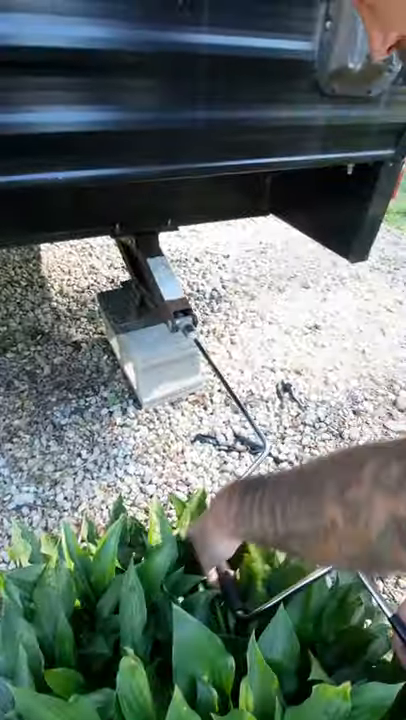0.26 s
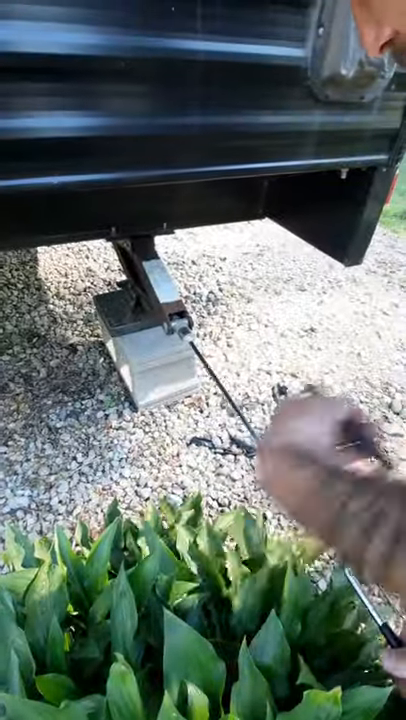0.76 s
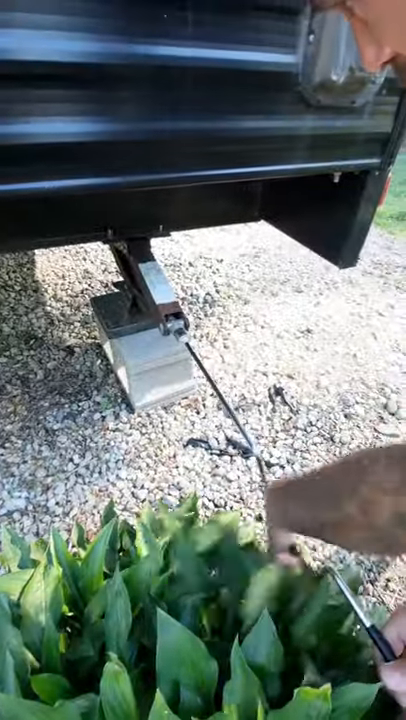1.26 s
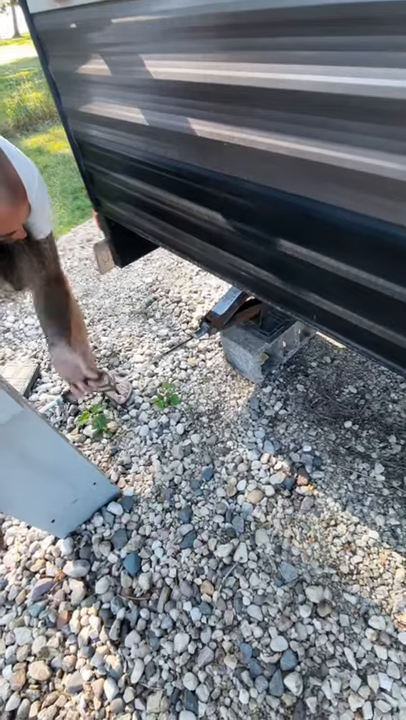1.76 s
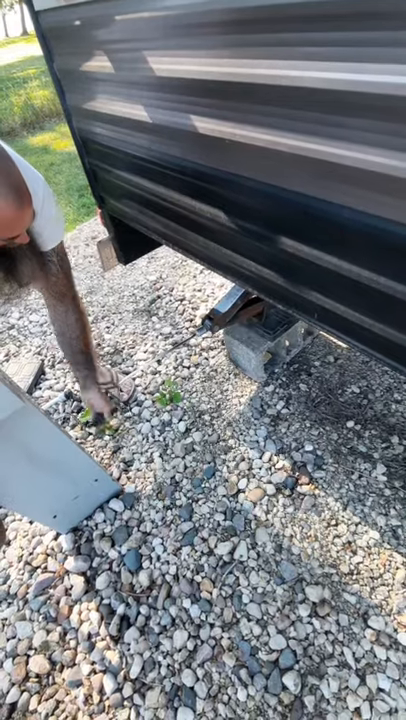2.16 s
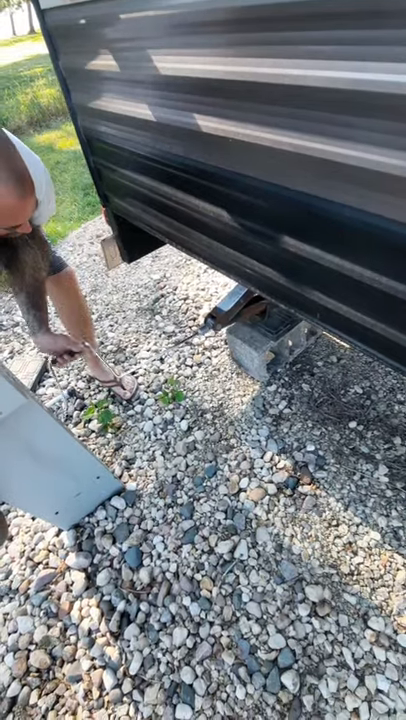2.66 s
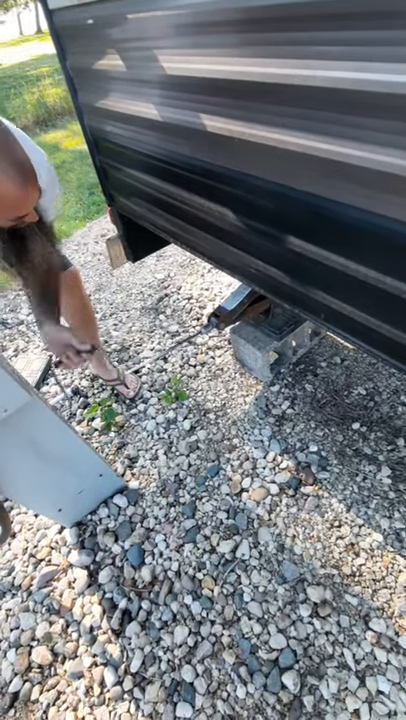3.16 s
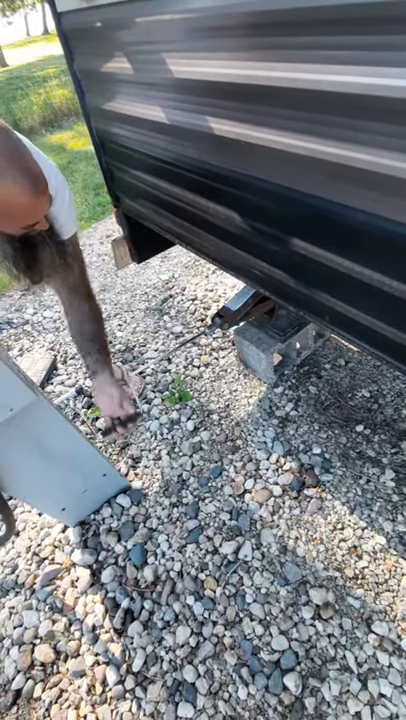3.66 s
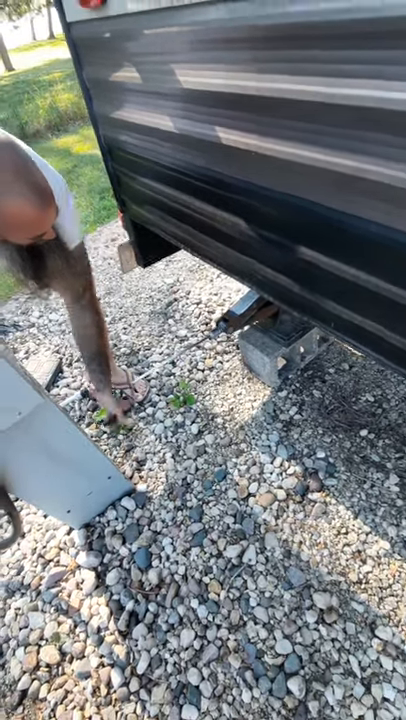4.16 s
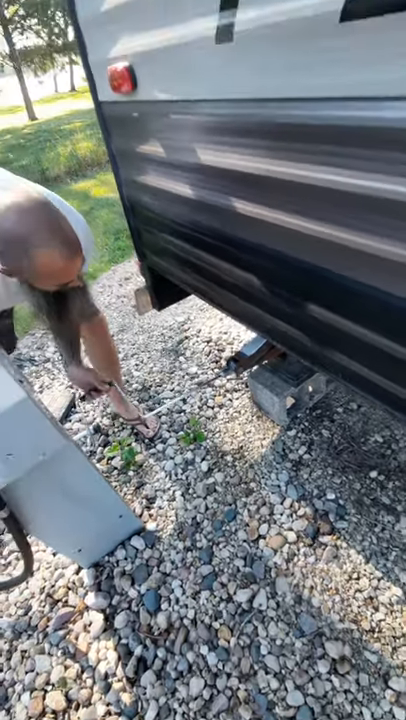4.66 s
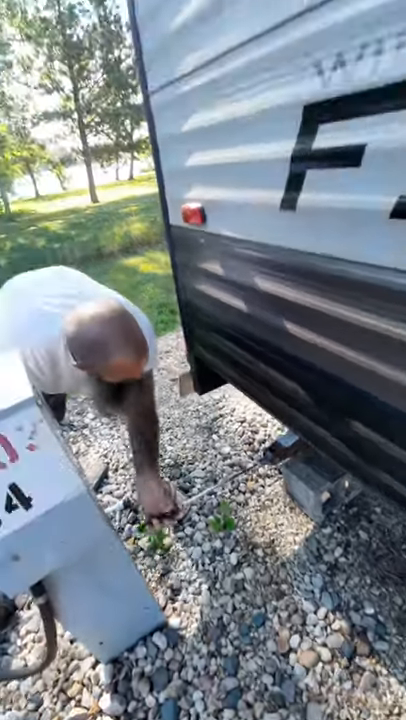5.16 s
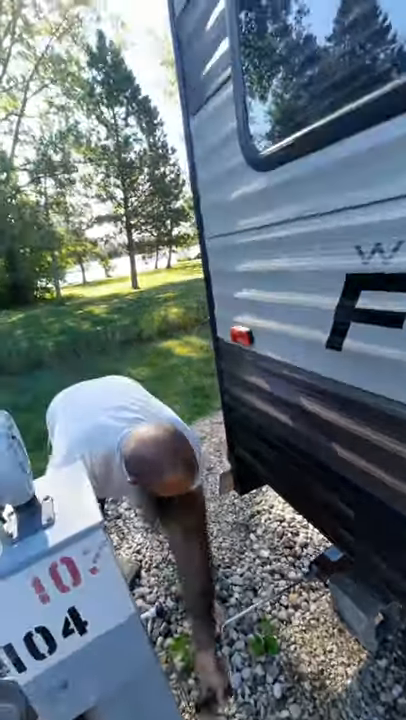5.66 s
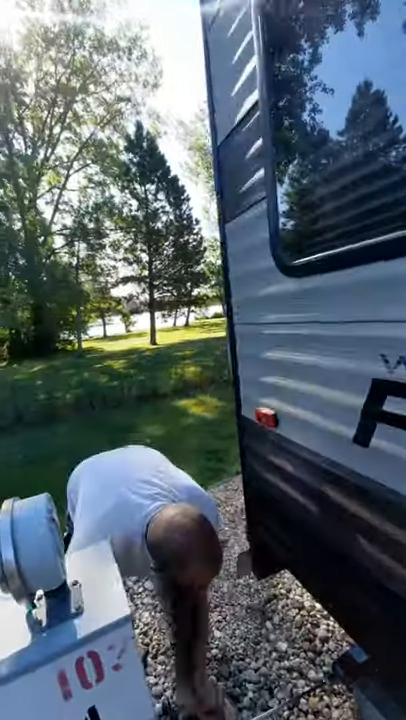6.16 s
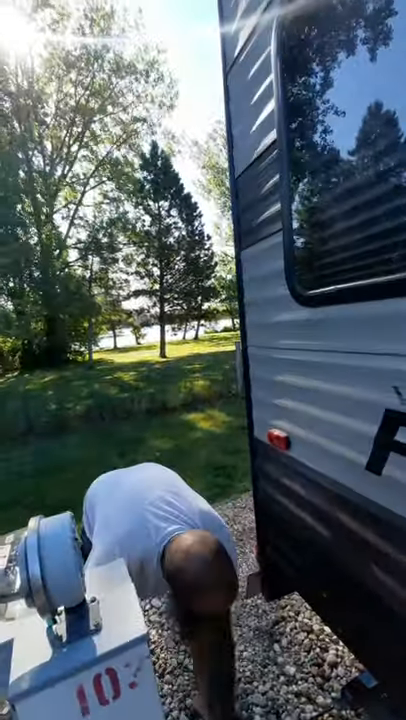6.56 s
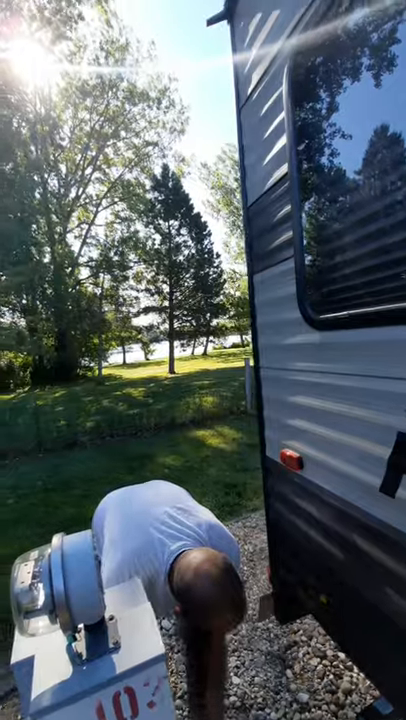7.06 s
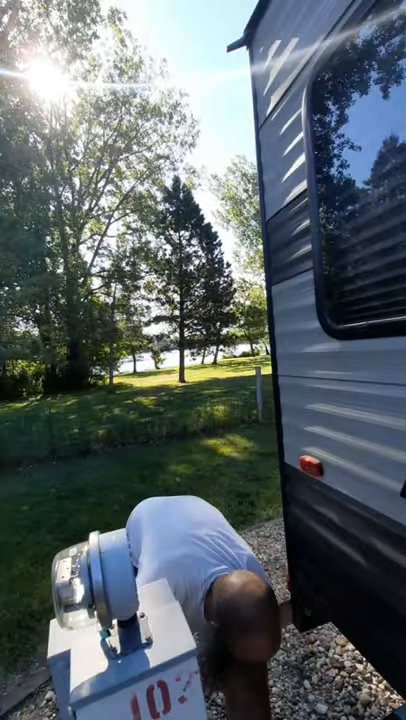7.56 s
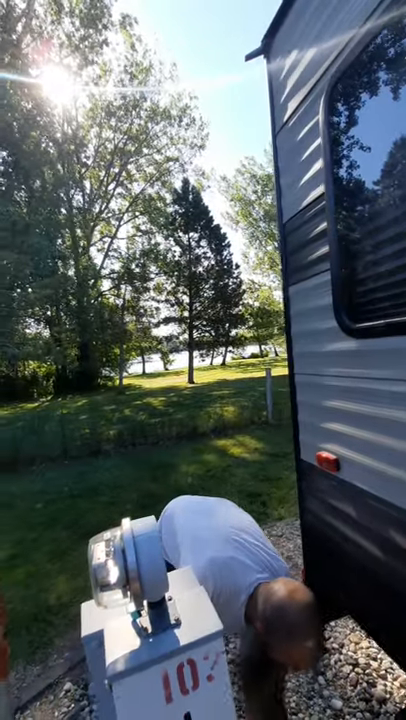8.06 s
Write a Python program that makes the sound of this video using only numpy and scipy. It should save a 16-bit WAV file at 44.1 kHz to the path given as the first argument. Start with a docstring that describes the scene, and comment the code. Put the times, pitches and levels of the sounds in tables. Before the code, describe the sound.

A loose crank knocks and rattles in its socket beneath a parked trailer, with quiet open air behind. After faint foliage brushes, the screw grinds and gives bright, very brief chirping squeaks, densest in the middle. Later it scrapes and groans under load, the frame booms low, and the clatter thins out. The sound is dry and near, with slight scatter off gravel and two momentary gaps.

```python
"""Stick-slip and impact in a hand-cranked trailer jack

Outdoors, a steel stabilizer jack under a trailer is wound up by hand. The loose crank knocks, exciting the
damped modes of jack and frame; the dry screw grinds as broadband friction that follows the crank effort,
squeaks as kHz stick-slip, scrapes as dense tiny chirps and groans as slow judder. Air, a far hum and early
leaf brushing lie behind. Two brief silences interrupt the sound."""
import sys
import numpy as np
from scipy import signal
from scipy.fft import rfft, irfft, next_fast_len
from scipy.io import wavfile
from scipy.ndimage import uniform_filter1d, map_coordinates

SR = 44100
rng = np.random.default_rng(int(sys.argv[2]) if len(sys.argv) > 2 else 0)


def file_out(sig):
    """Save sig as 16-bit WAV at sys.argv[1]."""
    # one column per channel
    cols = np.atleast_2d(sig).T
    # limit, then scale
    lim = np.clip(cols, -1, 1)
    pcm = np.round(lim * 32767).astype(np.int16)
    wavfile.write(sys.argv[1], SR, pcm)


N = 365985
TIME = np.arange(N) / SR

# Levels in the tables are relative: the functions add their own trims.
# Far hum. Each row: frequency in Hz, mean level in dB.
FAR_HUM = [(75, -62.5), (143, -65)]
# Spectrum of the open air. Each row: frequency in Hz, density in dB.
AIR_SPECTRUM = [(20, -13.5), (35, -3.5), (70, 1), (140, -4), (215, -8.5), (350, 6.5), (1000, -11.5),
                (2500, -4.5), (4500, -0.5), (8000, -14), (15000, -13.5)]
# Soft brushing, as of an arm against leaves. Each row: peak time in seconds, half-length in seconds, level in dB.
BRUSH_STROKES = [(0.503, 0.11, -44.5), (1.071, 0.071, -44.5), (1.234, 0.075, -43)]
# Spectrum of the brushing. Each row: frequency in Hz, density in dB.
BRUSH_SPECTRUM = [(300, -1.5), (1500, -7), (4000, -1), (8000, -7), (13000, -8), (16000, -9)]
# The trailer shifts on the jack. The one row: start in seconds, level in dB.
TRAILER_SHIFT = (7.205, -18)
# Drive of the grinding. Each row: time in seconds, crank effort as frame hum in dB, low rumble in dB.
CRANK_EFFORT = [(0.0, -50, -45), (0.08, -63.5, -69), (0.68, -43, -65), (0.88, -58.5, -64),
                (1.6, -43, -49.5), (1.88, -50.5, -46), (2.16, -38.5, -41.5), (3.32, -52, -53.5),
                (3.52, -50, -48), (3.88, -53.5, -72), (3.96, -45.5, -68), (4.88, -52.5, -52),
                (4.96, -52.5, -39), (5.52, -52, -51.5), (6.84, -41.5, -61.5), (7.08, -57.5, -54),
                (7.32, -36.5, -45), (7.64, -64.5, -55), (7.88, -45, -58), (8.28, -56.5, -49)]
# Spectrum of the trailer body's rumble. Each row: frequency in Hz, density in dB.
RUMBLE_SPECTRUM = [(20, -42.5), (45, 6), (72, 0), (115, 5), (165, -16), (220, -17), (500, -46.5)]
# Modes of the trailer frame, before the rise under load. Each row: frequency in Hz, level in dB, t60 in seconds.
FRAME_MODES = [(99, -11.5, 0.44), (153.8, -8.5, 0.38), (290.3, -4, 0.42), (294, -4, 0.34), (311.4, 2, 0.22),
               (326.8, 1, 0.4), (349.5, 3, 0.16), (385, -8, 0.1), (479, -21.5, 0.43)]
# Modes of jack and crank, before detuning. Each row: frequency in Hz, level in dB, t60 in seconds.
STEEL_MODES = [(517, -4.5, 0.22), (638.5, 5, 0.26), (734, -6.5, 0.077), (923, -1.5, 0.16), (991, 2.5, 0.21),
               (1238, 7, 0.075), (1663, 0.5, 0.18), (1759, 8, 0.075), (2070, -11.5, 0.034),
               (2245, 7, 0.086), (2360, 2, 0.058), (2786, -1, 0.1), (3670, 2.5, 0.036)]
# High modes of the screw rod, before detuning. Each row: frequency in Hz, level in dB, t60 in seconds.
ROD_MODES = [(3690, 1.5, 0.041), (3670, -5.5, 0.14), (3900, -5, 0.29), (4130, 21, 0.006), (4170, -3, 0.18),
             (4270, 8, 0.089), (4510, 7, 0.095), (5990, 6.5, 0.11), (7200, -6, .07), (7620, -13, 0.31),
             (8000, -3, 0.096), (11600, -6, 0.059), (11800, -8.5, 0.055)]
# The crank knocks in its socket. Each row: start in seconds, steel clank in dB, frame thud in dB.
CRANK_KNOCKS = [(0.231, -33, -33.5), (0.739, -33.5, -28.5), (1.059, -34.5, -28), (1.376, -49.5, -32.5),
                (1.512, -35, -27), (1.73, -55, -32.5), (1.896, -46, -45), (2.016, -46, -43),
                (2.052, -49, -36), (2.136, -40, -43), (2.144, -27, -48), (2.18, -32, -24),
                (2.237, -31, -33), (2.28, -45, -40), (2.373, -42, -29), (2.524, -36, -42), (2.62, -35, -25),
                (2.868, -32.5, -26), (2.949, -42, -32), (3.304, -45.5, -37), (3.389, -45.5, -38),
                (3.498, -25, -43), (3.537, -40, -28.5), (3.614, -40.5, -31), (3.925, -37.5, -38.5),
                (3.945, -38, -36.5), (3.96, -34.5, -33), (3.983, -40, -35), (4.002, -40, -46),
                (4.1, -43, -52), (4.02, -49, -54), (4.323, -37, -31), (4.435, -49, -33.5),
                (4.627, -34.5, -44), (4.656, -35.5, -42), (4.912, -33, -35.5), (5.005, -42, -33.5),
                (5.056, -43, -47), (5.108, -50.5, -32.5), (5.344, -40.5, -35), (5.678, -40, -27),
                (5.957, -44.5, -49), (6.185, -38.5, -35), (6.42, -43, -34), (6.563, -44, -42),
                (6.779, -46, -32), (6.865, -44.5, -34), (6.921, -47, -34.5), (7.234, -39.5, -27.5),
                (7.788, -41, -31.5), (7.931, -63, -30), (7.97, -50.5, -41)]
# Spectrum of the clank's crack and of the grinding. Each row: frequency in Hz, density in dB.
CLANK_SPECTRUM = [(150, -24.5), (450, 13), (1000, 5.5), (2300, 7), (3500, 3.5), (6000, -2), (12000, -15),
                  (16000, -21.5)]
# Spectrum of the jack arms' many close modes. Each row: frequency in Hz, density in dB.
ARMS_SPECTRUM = [(200, -15), (420, 5), (650, -3.5), (1300, 2.5), (2400, 1), (4000, -17.5), (12000, -34.5)]
# Groans of the loaded screw, one list each. Each row: time in seconds, slip rate in Hz, level in dB.
SCREW_GROANS = [
    [(5.98, 340.3, -41), (6.05, 341, -27), (6.11, 314.6, -29.5), (6.15, 338.8, -42.5), (6.23, 349, -23),
     (6.33, 366, -37), (6.38, 345, -52)],
    [(6.54, 449, -42), (6.58, 467, -35), (6.708, 451, -29), (6.736, 402.3, -31.5), (6.75, 351.6, -22.5),
     (6.788, 337.4, -12), (6.812, 353.5, -28.5), (6.872, 337.4, -31), (6.93, 318, -33.5), (7.01, 315, -43)],
    [(7.24, 350, -29), (7.3, 359.7, -37), (7.47, 353, -60)],
]
# Spectrum of the arms' buzz in a groan. Each row: frequency in Hz, gain in dB.
BUZZ_SPECTRUM = [(500, -2), (650, -9.5), (1100, -7.5), (4000, -2)]
# Sharp dry ticks of the socket. Each row: start in seconds, level in dB.
SOCKET_TICKS = [(1.511, -42.5), (1.866, -45), (2.237, -64), (2.618, -63), (4.913, -27.5), (6.917, -31),
                (7.962, -34)]
# Steel scraping on steel. Each row: start in seconds, rise in seconds, fall in seconds, level in dB,
# treble against the body in dB.
STEEL_SCRAPES = [(2.469, 0.0053, 0.052, -30, -6.5), (2.86, 0.013, 0.013, -24, -21),
                 (3.82, 0.012, 0.019, -34, -1), (3.93, 0.058, 0.098, -42.5, 0.5),
                 (4.179, 0.0064, 0.12, -44, -5), (5.202, 0.0065, .012, -31, -26),
                 (5.674, 0.0064, 0.065, -40.5, -10.5), (5.804, 0.01, 0.019, -47, -16),
                 (5.859, 0.016, 0.0096, -42.5, 3.5), (5.906, 0.0054, 0.011, -38, -30),
                 (5.987, 0.0088, 0.09, -36, 7), (6.144, 0.0083, 0.07, -32.5, -8),
                 (6.209, 0.0039, 0.017, -37, -3.5), (6.222, 0.03, 0.06, -27, -1),
                 (6.255, 0.048, 0.043, -27, -3), (6.554, 0.0099, 0.067, -39.5, -29.5),
                 (6.715, 0.033, 0.015, -27.5, -12), (6.742, 0.054, 0.026, -20.5, -12),
                 (6.84, 0.041, 0.027, -33, -11), (6.943, 0.014, 0.027, -38, 5),
                 (7.119, 0.02, 0.12, -36.5, 10.5), (7.2, 0.065, 0.1, -36, -13.5),
                 (7.404, 0.011, 0.005, -43.5, 0.5), (7.751, 0.018, 0.046, -26, 5),
                 (7.776, 0.03, 0.034, -21.5, 1.5)]
# Spectrum of the scrapes' body and of rough squeaks. Each row: frequency in Hz, density in dB.
SCRAPE_SPECTRUM = [(500, -34), (1600, -16.5), (2700, -6), (3600, -1.5), (4250, 6.5), (4900, 0), (6150, -1),
                   (7000, -2), (9500, -11.5), (16000, -21.5)]
# Spectrum of the scrapes' treble. Each row: frequency in Hz, density in dB.
TREBLE_SPECTRUM = [(2000, -23.5), (5000, -31), (6800, 3), (7700, 6.5), (8600, 4), (9700, -5), (11600, 4),
                   (13000, 6.5), (16000, -9)]
# Squeaks of the dry thread. Each row: start in seconds, length in seconds, first Hz, last Hz, level in dB,
# left minus right in dB, roughness from 0 to 1, overtones against the tone in dB.
THREAD_SQUEAKS = [(1.153, 0.0099, 5950, 5900, -25, -2, 0.23, -17),
                  (1.788, 0.023, 5950, 6050, -25.5, 8, 0.5, -24),
                  (2.346, 0.012, 6050, 6120, -26, 4.5, 0.57, -10.5),
                  (2.394, 0.0076, 6100, 6360, -16, -4, 0.7, -26),
                  (2.458, 0.056, 6330, 6150, -16.5, -7.5, 0.01, -26),
                  (2.508, 0.0069, 3700, 3750, -20.5, 1, 0.67, -14),
                  (2.779, 0.021, 4640, 4600, -36, 0, 0, -18), (2.792, 0.02, 4635, 4430, -16, 0.5, 0.3, -17),
                  (2.831, 0.077, 4366, 4300, -15, -6.5, 0.1, -12.5),
                  (2.872, 0.035, 4245, 4270, -11.5, 39, 0.15, -8.5),
                  (3.02, 0.025, 5640, 5930, -11.5, -6, 0.16, -11),
                  (3.042, 0.021, 6130, 6110, -8, 6.5, 0.07, -11),
                  (3.104, 0.022, 6270, 6060, -8.5, -1, 0.16, -13.5),
                  (3.155, 0.025, 6100, 6150, -31, 6, 0.25, -20),
                  (3.183, 0.067, 6194, 6190, -11, 7, 0.03, -19.5),
                  (3.241, 0.039, 6167, 6190, -16.5, 1, 0.08, -14.5),
                  (3.673, 0.018, 5580, 5930, -9, -7, 0.16, -3.5),
                  (3.703, 0.014, 5790, 6120, -13, 4, 0.16, -10.5),
                  (3.805, 0.063, 6183, 6150, -12, 4, 0.15, -11),
                  (3.869, 0.03, 6230, 6200, -23.5, -2, 0, -24),
                  (3.925, 0.011, 1740, 1740, -33.5, -3, 0.26, -25),
                  (3.943, 0.013, 2250, 2180, -31, -5, 0.5, -22),
                  (4.056, 0.028, 2670, 2900, -34.5, 0, 0.77, -14),
                  (4.098, 0.031, 987, 990, -45, 8, 0.1, -11),
                  (4.197, 0.013, 4080, 4250, -32, -1, 0.44, -5.5),
                  (4.261, 0.014, 6140, 5880, -30.5, 4.5, 0.24, -10.5),
                  (4.388, 0.017, 6260, 6270, -14, 8, 0.47, -3),
                  (4.464, 0.02, 5820, 5900, -20, -5, 0.34, -27),
                  (4.564, 0.018, 4930, 4860, -11, -2, 0.15, -18),
                  (4.785, 0.026, 6090, 6060, -38, -11.5, 0.05, -29),
                  (4.847, 0.014, 4580, 4050, -36.5, -8, 0.95, -24),
                  (5.09, 0.018, 6420, 6250, -9, 0, 0.32, -8),
                  (5.221, 0.068, 6266, 6273, -7.5, 9.5, 0.04, -13),
                  (5.296, 0.026, 6170, 5950, -13.5, -5, 0.33, -13),
                  (5.404, 0.023, 7800, 7570, -13.5, -2.5, 0.23, -11),
                  (5.576, 0.075, 5940, 6030, -44, -4, 0.03, -28),
                  (5.813, 0.023, 4160, 4240, -34, 1, 0.18, -32),
                  (5.856, 0.026, 4280, 4450, -28.5, 7, 0.9, -16.5),
                  (5.991, 0.019, 6100, 5950, -29.5, -12, 0.4, -15),
                  (6.014, 0.021, 6000, 5900, -24.5, -14, 0.95, -18),
                  (6.077, 0.027, 4630, 4620, -36.5, -13, 0.36, -15),
                  (6.16, 0.022, 4570, 4550, -20.5, -15, 0, -16.5),
                  (6.323, 0.044, 5970, 6030, -17, -5, 0.11, -6.5),
                  (6.348, 0.047, 6115, 5933, -13, -8, 0.05, -8.5),
                  (6.757, 0.029, 3780, 3790, -18, -5, 0.5, 5.5),
                  (7.114, 0.034, 3730, 3950, -24, -2, 0.54, 15),
                  (7.128, 0.027, 3430, 3530, -18.5, 29, 0.13, 25),
                  (7.141, 0.019, 4294, 4210, -19.5, 24, 0.07, -30),
                  (7.148, 0.032, 4070, 3924, -20, -3, 0, -1),
                  (7.169, 0.051, 3580, 3466, -18.5, -4.5, 0.08, 21),
                  (7.794, 0.037, 3880, 3880, -17, 0, 0.3, 20)]
# Arrival as the phone moves round. Each row: time in seconds, lag of the left port in ms (negative: early).
LEFT_PORT_LAG = [(0, -0.26), (1.4, -0.09), (3.9, -0.053), (4.6, -0.013), (5.3, 0.3023), (6.2, 0.35),
                 (8.3, 0.34)]
# Brief silences. Each row: start in seconds, end in seconds.
SILENT_SPANS = [(1.297, 1.364), (8.16, 8.231)]

LOW_CUT_HZ, TOP_HZ = 67, 16100  # edges of the passband
AIR_DB = -57.5
RUSTLE_DB, RUSTLE_UNTIL_S = -56, 1.33  # steady rustle under the strokes; all brushing ends at this time
# the frame's pitch rises under load (share per s, from its tuning at the given time) and wanders (share)
FRAME_RISE_PER_S, FRAME_TUNED_AT_S, FRAME_WANDER = .016, 3.5, .03
# shudder after a knock: hum and rumble against the thud, and decay time
SHUDDER_HUM_DB, SHUDDER_RUMBLE_DB, SHUDDER_T60_S = -9, -13, 0.62
# grinding: its level at the given effort, and its slope
GRIT_DB, GRIT_AT_DB, GRIT_DB_PER_DB = -52.5, -45.5, 0.44
# rattles of the loose crank: the strongest against the effort, and how far the weakest lies from it
RATTLES_PER_S, RATTLE_DB, RATTLE_SPREAD_DB = 0.89, -22.5, -4
# bounces: longest gap between contacts, first bounce against the first contact, and loss at each later one
BOUNCE_GAP_S, BOUNCE_DB, BOUNCE_LOSS_DB = 0.02, -9, -3
# uneven slips blur a groan: share against the steady tone, and rate of wandering
GROAN_BLUR, GROAN_BLUR_PER_S = .3, 110
BUZZ_DB = -36  # for a groan at 0 dB; follows half the groan's level in dB
# chirps of a scrape: rate, length, largest glide either way (share of pitch), range of level
CHIRPS_PER_S, CHIRP_S, CHIRP_GLIDE, CHIRP_SPREAD_DB = 4500, .018, .035, 14
SLIDE_HISS_DB = -2  # even hiss of sliding steel against the chirps
# a squeak at full grip saturates, so its level stays flat instead of swelling
FULL_GRIP_DB, SATURATES_WITHIN_DB = -8, 0.5
GRIP_WANDER_DB, GRIP_WANDERS_PER_S = 1.2, 70  # wavering of the hand's pressure


def undb(db):
    """Decibel law: level to amplitude gain."""
    return 10 ** (np.asarray(db) / 20)


def unit(x):
    """Normalisation to an rms of 1."""
    return x / np.sqrt(np.mean(x ** 2))


def curves(table):
    """Linear interpolation of each column of a timed table at every sample."""
    s, *columns = np.transpose(table)
    return [np.interp(TIME, s, c) for c in columns]


def add(out, s, x):
    """Superposition: mix a short sound in at time s."""
    i = int(s * SR)
    out[..., i:i + x.shape[-1]] += x[..., :N - i]


def walk(rate, size):
    """Band-limited fluctuation: smoothly joined random values at a given rate per s, spread near 1."""
    at = np.arange(size) * rate / SR
    return map_coordinates(rng.standard_normal(8192), [at], order=2, mode="wrap")


def colour(x, spectrum):
    """Linear filtering by a spectrum interpolated over log frequency."""
    hz, db = np.transpose(spectrum)
    size = next_fast_len(x.shape[-1], real=True)
    freq = np.maximum(np.fft.rfftfreq(size, 1 / SR), 1)
    gain = undb(np.interp(np.log(freq), np.log(hz), db))
    return irfft(rfft(x, size) * gain, size)[..., :x.shape[-1]]


def noise(size, apart):
    """Partial coherence: stereo noise with a common part and a share that differs between the ports."""
    return unit(rng.standard_normal(size) + apart * rng.standard_normal((2, size)))


def lean(left_minus_right_db):
    """Level difference between the two channels, as a pair of gains."""
    return undb([[left_minus_right_db / 2], [-left_minus_right_db / 2]])


def fade(t, t60):
    """Exponential damping by 60 dB in t60."""
    return np.exp(-np.log(1000) * t / t60)


def ring(modes, t, spread_db, apart, detune=0.0069):
    """Modal superposition: damped sines with random strength and tuning, and a phase for each port."""
    hz, db, t60 = np.transpose(modes)[:, :, None]
    size, shift_hz, phase, skew = rng.standard_normal((4, len(modes), 1))
    turn = 2 * np.pi * hz * (1 + detune * shift_hz) * t + np.pi * phase
    share = undb(db + spread_db * size)
    swing = share * fade(t, t60) / np.sqrt(np.sum(share ** 2))
    return np.array([np.sum(swing * np.sin(turn + side * apart * skew), axis=0) for side in (1, -1)])


def convolve(x, response):
    """Linear response: convolution of x with a stereo impulse response."""
    return signal.fftconvolve(np.atleast_2d(x), response, axes=1)[:, :N]


def outdoors(apart=7.2, lean_db=2.0):
    """Ambient noise: coloured air, steady far tones, and leaf friction in Gaussian strokes."""
    air = unit(colour(noise(N, apart=1.0), AIR_SPECTRUM)) * undb(AIR_DB + walk(1.0, N))
    hum = 0
    for hz, db in FAR_HUM:
        hum = hum + undb(db + 2 * walk(0.94, N)) * np.sqrt(2) * np.sin(2 * np.pi * hz * TIME)
    brush = unit(colour(noise(N, apart) * undb(2 * walk(150, N)), BRUSH_SPECTRUM))
    strokes = sum(undb(db) * np.exp(-((TIME - s) / half) ** 2) for s, half, db in BRUSH_STROKES)
    sweeps = (undb(RUSTLE_DB) + strokes) * (TIME < RUSTLE_UNTIL_S)
    return air + hum + brush * sweeps * lean(lean_db)


def shift(boom_hz=75, rise_s=0.0082, t60=0.16, boom_db=8):
    """Damped oscillation: one low mode booms as the trailer body moves on its support."""
    out = np.zeros(N)
    t = np.arange(int(SR / 2)) / SR
    start, db = TRAILER_SHIFT
    envelope = (1 - np.exp(-t / rise_s)) * fade(t, t60)
    add(out, start, undb(db + boom_db) * np.sin(2 * np.pi * boom_hz * t) * envelope)
    return out


def frame_pitch(s):
    """Stiffening under load: the frame's pitch ratio at time s rises steadily."""
    return 1 + FRAME_RISE_PER_S * (s - FRAME_TUNED_AT_S)


def shudder():
    """Addition of energies: amplitude of the shaking left by the knocks so far."""
    power = np.zeros(N)
    t = np.arange(SR) / SR
    for s, _, frame_db in CRANK_KNOCKS:
        add(power, s, (undb(frame_db) * fade(t, SHUDDER_T60_S)) ** 2)
    return np.sqrt(power)


def rattles(effort, t60=.12):
    """Random impacts with exponential decay: envelope of small crank rattles, stronger with effort."""
    out = np.zeros(N)
    t = np.arange(int(SR / 2)) / SR
    for when, size in rng.random((int(RATTLES_PER_S * N / SR), 2)):
        db = effort[int(when * N)] + RATTLE_DB + RATTLE_SPREAD_DB * size
        add(out, when * N / SR, undb(db) * fade(t, t60))
    return out


def turning(drone_db=1, rumble_db=1, grain_db=4.0):
    """Friction-driven resonance: countless small slips hum in the frame, with rumble and broadband grit."""
    effort, rumble = curves(CRANK_EFFORT)
    shaking = shudder()
    t = np.arange(int(SR / 2)) / SR
    slips = rng.standard_normal(N) * undb(grain_db * walk(30, N))
    hum = convolve(slips, ring(FRAME_MODES, t, spread_db=2, apart=0.16) * fade(t, t60=0.24))
    # reading the hum at a varying speed bends its pitch
    bent = np.cumsum(frame_pitch(TIME) * (1 + FRAME_WANDER * walk(9, N)))
    frame = unit(np.array([np.interp(bent, np.arange(N), port, period=N) for port in hum]))
    grinding = unit(colour(noise(N, apart=1.0) * undb(2.7 * walk(100, N)), CLANK_SPECTRUM))
    body = unit(colour(noise(N, apart=.5), RUMBLE_SPECTRUM))
    grit = undb(GRIT_DB + GRIT_DB_PER_DB * (effort - GRIT_AT_DB))
    # independent excitations add as powers
    frame_level = np.hypot(undb(effort + drone_db), undb(SHUDDER_HUM_DB) * shaking)
    body_level = np.hypot(undb(rumble + rumble_db), undb(SHUDDER_RUMBLE_DB) * shaking)
    return frame_level * frame + body_level * body + np.hypot(grit, rattles(effort)) * grinding


def contacts(t, t60, count=3):
    """Repeated impact: envelope of a first contact and its bounces, each weaker than the last."""
    delays = np.cumsum(BOUNCE_GAP_S * rng.random(count))
    power = fade(t, t60) ** 2
    for k, s in enumerate(delays):
        strength = undb(BOUNCE_DB + BOUNCE_LOSS_DB * k)
        power = power + strength ** 2 * (t > s) * fade(np.abs(t - s), t60) ** 2
    return np.sqrt(power)


def knocks(steel_db=-12.5, crack_db=-14, thud_db=3, crack_t60=0.037, rattle_db=-13, rattle_t60=0.42,
           contact_s=.007, thud_rise_s=0.0067, grate_t60=0.019, steel_lean_db=3, body_db=-15, body_t60=0.14):
    """Impact excitation of modes: bouncing contact rings the steel, and the heavy frame swings up slower."""
    out = np.zeros((2, N))
    t = np.arange(int(SR / 3)) / SR
    for s, clank_db, frame_db in CRANK_KNOCKS:
        uneven = undb(4 * walk(130, len(t)))
        rattle = (contacts(t, crack_t60) + undb(rattle_db) * fade(t, rattle_t60)) * uneven
        crack = unit(colour(noise(len(t), apart=1.0), CLANK_SPECTRUM) * rattle)
        grate = rng.standard_normal(len(t)) * contacts(t, grate_t60)
        modes = ring(STEEL_MODES, t, spread_db=3.5, apart=0.71, detune=.045)
        steel = unit(convolve(grate, modes)[:, :len(t)] * lean(steel_lean_db))
        # the jack's arms have many close modes, heard as decaying noise
        body = unit(colour(noise(len(t), apart=1.0), ARMS_SPECTRUM) * fade(t, body_t60))
        clank = undb(steel_db) * steel + undb(crack_db) * crack + undb(body_db) * body
        clank = clank * np.minimum(t / contact_s, 1) ** 2
        frame = ring(FRAME_MODES, t * frame_pitch(s), spread_db=2.5, apart=0.23, detune=0.0303)
        thud = frame * (1 - np.exp(-t / thud_rise_s))
        add(out, s - contact_s / 2, undb(clank_db) * clank + undb(frame_db + thud_db) * thud)
    return out


def groan(level_db=-5.5, edge_s=0.018, jitter=0.025, flutter_db=2, overtone_db=-17.5, step_db=-5):
    """Low-rate stick-slip: uneven judder gives a blurred tone with overtones and buzzes the jack's arms."""
    out, slips = np.zeros((2, N))
    for judder in SCREW_GROANS:
        hz, db = curves(judder)
        sounding = np.clip(np.minimum(TIME - judder[0][0], judder[-1][0] - TIME) / edge_s, 0, 1)
        on = sounding > 0
        size = on.sum()
        phase = 2 * np.pi * np.cumsum(hz[on] * (1 + jitter * walk(250.6, size))) / SR
        in_phase, quadrature = walk(GROAN_BLUR_PER_S, size), walk(GROAN_BLUR_PER_S, size)
        tone = np.sin(phase) + GROAN_BLUR * (in_phase * np.sin(phase) + quadrature * np.cos(phase))
        for k in range(2, 5):
            overtone_level = overtone_db + step_db * (k - 2) + 2 * flutter_db * walk(40, size)
            tone += undb(overtone_level) * np.sin(k * phase)
        out[on] += sounding[on] * tone * undb(level_db + db[on] + flutter_db * walk(72, size))
        bursts = unit((1 + np.sin(phase)) ** 2 * rng.standard_normal(size))  # one noise burst per slip
        slips[on] += sounding[on] * undb(BUZZ_DB + db[on] / 2) * bursts
    t = np.arange(int(SR / 2)) / SR
    arms = ring(STEEL_MODES, t, spread_db=-3.5, apart=1.0, detune=0.017)
    buzz = colour(convolve(slips, arms), BUZZ_SPECTRUM)
    return out + unit(buzz) * np.std(slips)


def ticks(t60=0.045, lowest_hz=2500):
    """Brief impact: high-passed, decaying noise as the socket seats on the nut."""
    out = np.zeros((2, N))
    t = np.arange(int(SR / 10)) / SR
    highpass = signal.butter(1, lowest_hz, "high", fs=SR, output="sos")
    for s, db in SOCKET_TICKS:
        add(out, s, undb(db) * signal.sosfilt(highpass, noise(len(t), apart=0.95)) * fade(t, t60))
    return out


def chirps(sliding, apart=1.0):
    """Asperity contact: rough spots catch and chirp at random pitches while the steel slides; rms 1 there."""
    t = np.arange(int(CHIRP_S * SR)) / SR
    spots = rng.random((int(CHIRPS_PER_S * N / SR), 6))
    spots = spots[sliding[(spots[:, 0] * N).astype(int)]]
    when, pitch, slide, size, phase, skew = spots.T[:, :, None]
    glide = 1 + CHIRP_GLIDE * (slide - .5) * t / CHIRP_S
    turn = 2 * np.pi * (TOP_HZ * pitch * t * glide + phase)
    swell = undb(CHIRP_SPREAD_DB * size) * np.hanning(len(t))
    at = ((when * N).astype(int) + np.arange(len(t))).ravel()
    out = np.zeros((2, N))
    for port, side in enumerate((1, -1)):
        chirp = swell * np.sin(turn + side * apart * (2 * skew - 1))
        out[port] = np.bincount(at, chirp.ravel(), N)[:N]
    return out / np.std(out[:, sliding])


def scrapes(body_db=-2, treble_db=-6.5, rod_db=-5, fall_db=-16):
    """Sliding friction: dense chirps and hiss swell and let go, exciting the rod's high modes."""
    push, bright = np.zeros((2, N))
    for s, rise, fall, db, tilt_db in STEEL_SCRAPES:
        t = np.arange(int((rise + 2 * fall) * SR)) / SR
        swell = np.minimum(t / rise, 1) * undb(db + fall_db * np.maximum(t - rise, 0) / fall)
        add(push, s, swell)
        add(bright, s, swell * undb(tilt_db))
    sliding = push > 0
    chatter = undb(2 * walk(450, N) + 1.5 * walk(70, N))
    friction = chatter * (chirps(sliding) + undb(SLIDE_HISS_DB) * noise(N, apart=1.0))
    body = colour(friction, SCRAPE_SPECTRUM)
    treble = colour(friction, TREBLE_SPECTRUM)
    slips = undb(body_db) * push * body / np.std(body[:, sliding])
    slips = slips + undb(treble_db) * bright * treble / np.std(treble[:, sliding])
    t = np.arange(int(SR / 2)) / SR
    rod = convolve(slips, ring(ROD_MODES, t, spread_db=-5.5, apart=0.21, detune=0.00042))
    return slips + undb(rod_db) * unit(rod) * np.std(slips)


def squeaks(edge_s=0.0022, waver=0.013, jitter=0.057, flutter_db=4, overtone_step_db=-6, arch_db=5,
            rasp_db=-24, release_t60=0.028, lead_s=0.016, lead_db=-22):
    """Stick-slip at a few kHz: a gliding tone with overtones, chattering and rasping when the grip is uneven."""
    out, rasp = np.zeros((2, N)), np.zeros(N)
    for s, length, first_hz, last_hz, db, pan_db, rough, overtone_db in THREAD_SQUEAKS:
        t = np.arange(int((lead_s + length + 0.058) * SR)) / SR - lead_s
        wander = waver * np.sqrt(abs(rough)) * walk(77.6, len(t)) + jitter * rough * walk(700, len(t))
        hz = np.interp(t, [0, length], [first_hz, last_hz]) * (1 + wander)
        phase = 2 * np.pi * np.cumsum(hz) / SR
        tone = np.sin(phase)
        for k in range(2, 5):
            if k * first_hz < TOP_HZ:
                tone += undb(overtone_db + overtone_step_db * (k - 2)) * np.sin(k * phase)
        # the oscillation stirs faintly, builds up, and dies once the slip stops
        grip = np.interp(t, [-lead_s, 0, edge_s], [0, undb(lead_db), 1])
        grip *= fade(np.maximum(t - length + edge_s / 2, 0), release_t60)
        # below full grip it is strongest mid-stroke
        swell_db = arch_db * np.clip((FULL_GRIP_DB - db) / SATURATES_WITHIN_DB, 0, 1)
        arch = -swell_db * (2 * np.clip(t / length, 0, 1) - 1) ** 2
        flutter = rough * flutter_db * walk(230, len(t))
        grip *= undb(db + arch + flutter + GRIP_WANDER_DB * walk(GRIP_WANDERS_PER_S, len(t)))
        add(out, s - lead_s, unit(lean(pan_db)) * grip * unit(tone) / np.sqrt(2))
        add(rasp, s - lead_s, rough * grip)
    return out + undb(rasp_db) * rasp * unit(colour(noise(N, apart=0.61), SCRAPE_SPECTRUM))


def ports(x):
    """Time difference of arrival: the wavefront reaches the two microphone ports at different times."""
    lag = curves(LEFT_PORT_LAG)[0] * SR / 1000  # in samples
    at = np.arange(N)
    left = map_coordinates(x[0], [at - lag / 2], order=3)
    right = map_coordinates(x[1], [at + lag / 2], order=3)
    return np.array([left, right])


def scatter(x, near_db=-12, near_t60=0.1, tail_db=-24, tail_t60=0.54):
    """Diffuse reflection: quick returns from gravel and underside, then a longer faint tail."""
    t = np.arange(int(SR * .6)) / SR
    near = unit(rng.standard_normal((2, len(t))) * fade(t, near_t60) * (t > .003))
    tail = unit(rng.standard_normal((2, len(t))) * fade(t, tail_t60) * (t > .003))
    return x + convolve(x, (undb(near_db) * near + undb(tail_db) * tail) / np.sqrt(len(t)))


def scene():
    """Superposition of the open air, the shaking structure and the sounding screw."""
    moan = scatter(groan(), near_db=-7.5, near_t60=0.089, tail_db=-33, tail_t60=0.54)
    structure = ports(shift() + turning() + knocks() + moan) * lean(1.0)
    screw = scatter(ports(ticks() + scrapes() + squeaks()))
    return outdoors() + structure + screw


def record(dry):
    """Band limitation: deep bass rolls off, the top is cut steeply, and the level drops out twice."""
    live = np.ones(N)
    for start, end in SILENT_SPANS:
        live[int(start * SR):int(end * SR)] = 0
    gate = uniform_filter1d(live, size=90)  # edges of about 2 ms
    heard = signal.sosfilt(signal.butter(2, LOW_CUT_HZ, "high", fs=SR, output="sos"), dry)
    return signal.sosfilt(signal.ellip(10, .2, 80, TOP_HZ, fs=SR, output="sos"), heard * gate)


dry = scene()
out = record(dry)
file_out(out)
```